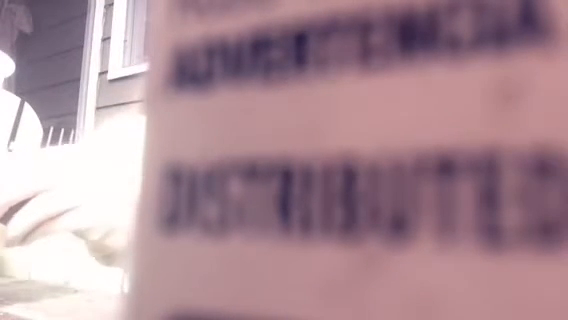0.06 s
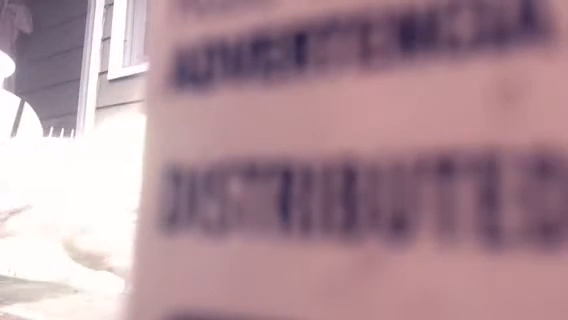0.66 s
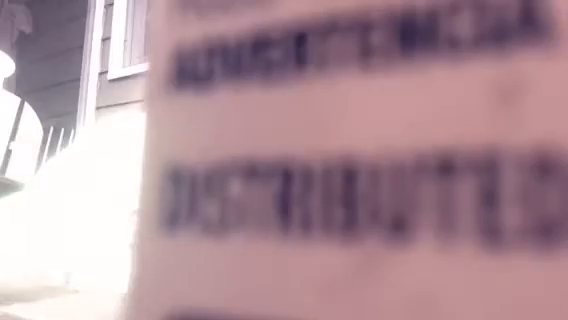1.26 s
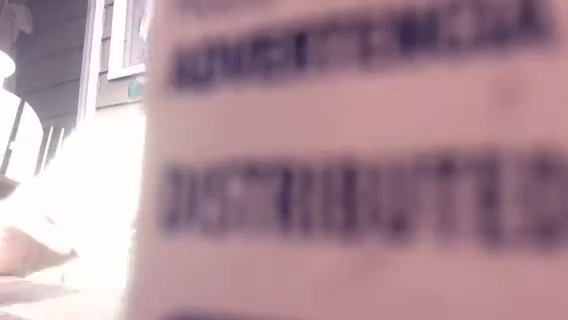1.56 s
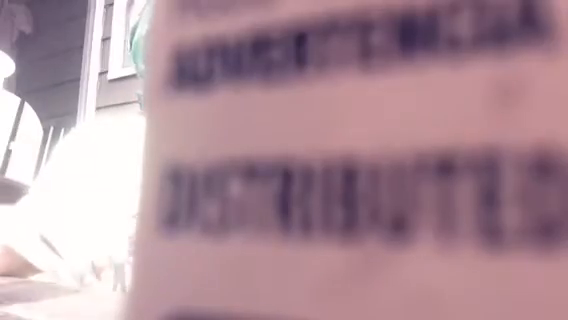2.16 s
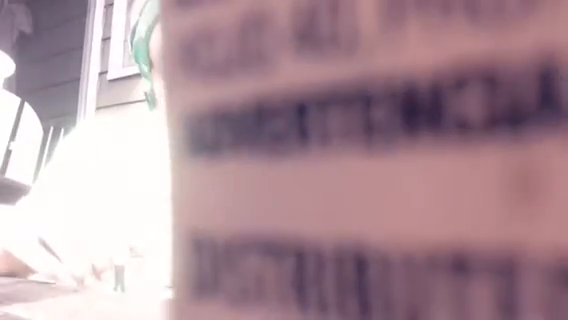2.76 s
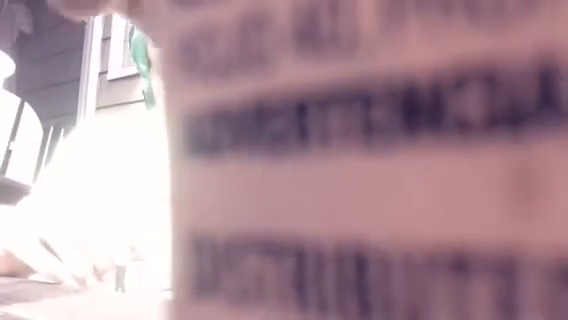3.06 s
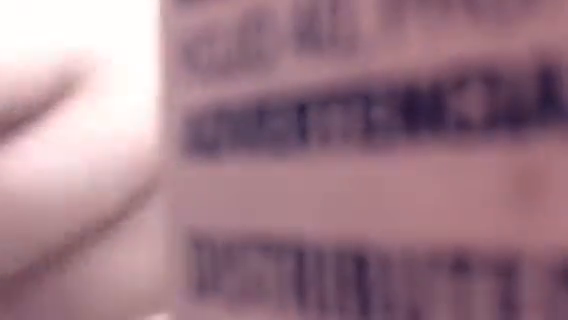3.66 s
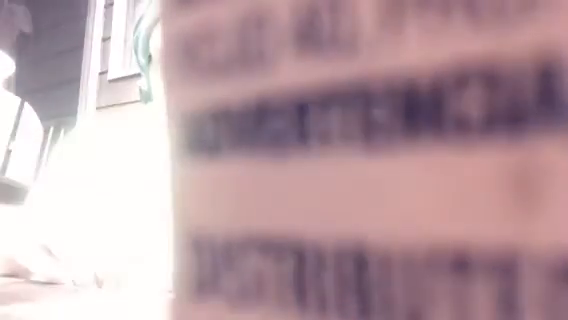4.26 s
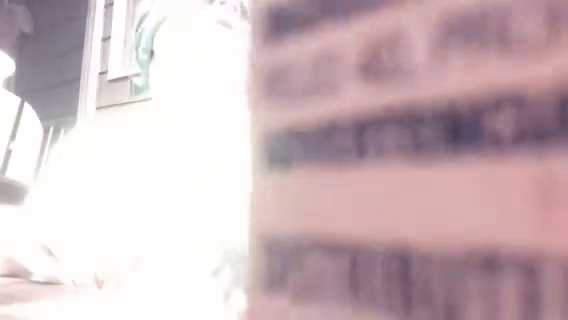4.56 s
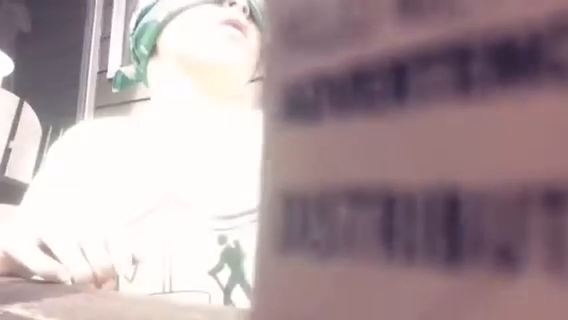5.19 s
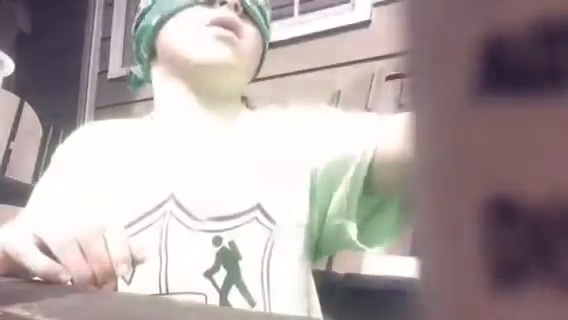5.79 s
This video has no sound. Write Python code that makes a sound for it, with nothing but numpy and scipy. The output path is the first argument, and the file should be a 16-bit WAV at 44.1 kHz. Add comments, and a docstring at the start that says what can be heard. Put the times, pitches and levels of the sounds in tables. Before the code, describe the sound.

Very close to the microphone, someone shifts a hollow box and small hard objects on a porch table. The start is quiet, then comes a sudden clatter with scraping, two separate sharp knocks, and a longer run of bumps, clacks and slides with fingers rubbing. The sound is nearly dry. Underneath are soft wind, a low hum, faint rapid interference ticks and a few thin bird calls.

```python
"""Knocks and slides on a porch table

A hollow box and small hard things are knocked, set down and pushed about close to the microphone.
Blows and friction ring the same modes: the top thumps, the things clack and scrape; fingers rub and tap.
Behind: wind rumble, a low hum, a few bird calls and even ticks of radio interference in the lead.
Near the end a faint, thin, steady tone sounds briefly at about 5.1 kHz."""
import sys
import numpy as np
from scipy import signal
from scipy.io import wavfile

SR = 44100
rng = np.random.default_rng(int(sys.argv[2]) if len(sys.argv) > 2 else 0)


def bounce(signal):
    """Save signal as a 16-bit WAV file at the path given by the first command-line argument."""
    frames = np.transpose(np.atleast_2d(signal))
    limited = np.clip(frames, -1, 1)
    pcm = np.round(limited * 32767).astype(np.int16)
    wavfile.write(sys.argv[1], SR, pcm)


N = 261513
TIME_S = np.arange(N) / SR

# (time [s], strength [dB], weight [dB], hardness [dB/octave])
BOX_BLOWS = [(2.4522, -21.5, 2, 4), (2.4581, -14, 1, -7), (2.701, -32, -14, -1), (2.7173, -22, 5, 3),
             (2.9066, -40, 13.5, -1.5), (2.9698, -49, 15, -4), (3.4235, -9.5, -5.5, -4),
             (3.471, -51, 11.5, 4), (4.4732, -25, 3, 1.1), (4.5068, -13, 4.5, -0.5),
             (4.6691, -22.5, -10, 0.5), (5.6185, -24, 4.5, -1), (5.771, -31.5, 1, 0.9)]
# (thump [dB], knock [dB], clack [dB], crack [dB], tick [dB])
BOX_VOICE_DB = [-9, 0.5, -10, -19, -33]
# (weight [dB], main ring [Hz])
BOX_RING_HZ = [(5, 570), (13, 305)]
def box_bumps():
    """A hollow box bumps the table top."""
    return knocks(BOX_BLOWS, BOX_VOICE_DB, BOX_RING_HZ, ring_share=.8)


# (time [s], strength [dB], weight [dB], hardness [dB/octave])
CLACK_BLOWS = [(0.391, -65, -3, 4), (0.487, -71, 12, 6), (0.609, -67, -3, 4), (1.302, -66, 1, 1),
               (2.4206, -19, 6.5, 3), (2.439, -18.5, 5, 0.5), (2.47, -29, -14, 4),
               (2.477, -13.5, -2.5, -1.5), (2.5581, -47.5, -12, 4.4), (2.5905, -35.5, -3.5, -4.5),
               (2.61, -33.5, -17, -9.5), (2.873, -42, 0.5, -3), (3.409, -12.5, -6.5, -1.8),
               (3.4232, -36, 4.5, 6.5), (3.789, -28, -8, -4.5), (3.8015, -16, -10.5, 1.6),
               (3.8159, -23, -10, -6), (4.494, -29.5, -16, 3.8), (4.5705, -30, 1, 0),
               (4.6125, -30, -10, -4.3), (4.619, -29, 2, -7), (4.7275, -35.5, -2.5, 2.6),
               (4.742, -31.5, 8, 1), (4.801, -25.5, 10, -3.5), (4.869, -40.5, 2.5, -4),
               (5.053, -57, 25, 4.5), (5.1392, -23, 3, -2), (5.4996, -25, 7.5, -1), (5.5365, -21.5, 3, 4),
               (5.556, -22, 8, 1.4), (5.5608, -25, 8.5, -0.5), (5.567, -34, -9, 5.5),
               (5.633, -36.5, -11, 3.2), (5.654, -25.5, 2, 0), (5.909, -51, 2, 6)]
# (thump [dB], knock [dB], clack [dB], crack [dB], tick [dB])
CLACK_VOICE_DB = [-6, 0, 2, -11, -27.5]
# (weight [dB], main ring [Hz])
CLACK_RING_HZ = [(-4, 1400), (1.5, 590), (4.5, 235)]
CLACK_RING_SHARE = .78
def clacks():
    """Small hard things strike the table as they are set down."""
    return knocks(CLACK_BLOWS, CLACK_VOICE_DB, CLACK_RING_HZ, CLACK_RING_SHARE)


def knocks(blows, voice_db, pitches, ring_share, grip_from_db=-28, grip_per_db=.05):
    """One contact per blow. The hand leaves a share of the ring time and grips harder on strong blows."""
    out = np.zeros(N)
    for start_s, strength_db, weight_db, hardness in blows:
        grip = np.clip(grip_per_db * (strength_db - grip_from_db), 0, .5)
        blow = part_gains(voice_db, strength_db, weight_db, hardness) @ contact(ring_share * (1 - grip))
        add(out, start_s, main_ring(blow, weight_db, pitches))
    return out


# (peak time [s], length [s], strength [dB], weight [dB], hardness [dB/octave])
PUSHES = [(0.629, 0.07, -68, -2, 6), (2.417, 0.028, -31, 10, -1.5), (2.468, 0.068, -15, 4.5, 0),
          (2.511, 0.034, -32.5, 7, -11), (2.595, .12, -41, 2, -1.5), (2.733, 0.075, -29.5, -8, -1.5),
          (2.787, .11, -35.5, -1, -1.8), (2.852, 0.035, -37.5, -6, -0.5), (3.408, 0.034, -24.5, -9, -4.5),
          (3.49, .07, -55.5, 1, 3.5), (3.841, 0.075, -37, -2.5, -0.5), (4.533, .067, -23, 1.5, 1.5),
          (4.607, .033, -32.5, 11.5, 2), (4.776, 0.15, -35, -15, 1.5), (5.117, .07, -26.5, 2.5, 2.5),
          (5.158, 0.055, -31.5, 4, 1), (5.228, 0.034, -39, 6, -9), (5.295, 0.034, -43, 4.5, 3),
          (5.382, 0.068, -33.5, 6, 1.64), (5.512, 0.17, -27.5, 5, 1), (5.558, 0.042, -24, -6, 4),
          (5.669, 0.041, -29.5, -8, -1.5), (5.728, 0.12, -30.5, -23, -3.5)]
# (thump [dB], knock [dB], clack [dB], crack [dB], tick [dB])
SLIDE_VOICE_DB = [-7, -1.5, -3, -15.5, -25]
# (weight [dB], main ring [Hz])
SLIDE_RING_HZ = [(3.5, 570), (8, 210)]
def slides(onset_s=.012, swell_share=.48, swell_db=14, fade_db=18):
    """Slips ring the same modes as the blows; each push swells to its hardest point and dies away."""
    out, t = np.zeros(N), np.arange(SR // 3) / SR
    for peak_s, length_s, strength_db, weight_db, hardness in PUSHES:
        swell_s, fade_s = swell_share * length_s, (1 - swell_share) * length_s
        rubbed = signal.fftconvolve(slips(SR)[None], contact(ring_share=.6), axes=1)
        steady = rubbed[:, SR // 2:SR // 2 + len(t)]
        gains = part_gains(SLIDE_VOICE_DB, strength_db, weight_db, hardness)
        scrape = sum(gain * unit_rms(part) for gain, part in zip(gains, steady))
        scrape = main_ring(scrape, weight_db, SLIDE_RING_HZ, mix_db=-4.5)
        push_db = np.minimum(swell_db * (t - swell_s) / swell_s, fade_db * (swell_s - t) / fade_s)
        add(out, peak_s - swell_s, scrape * np.minimum(t / onset_s, 1) * from_db(push_db))
    return out


# table and things: (frequency [Hz], level [dB], free t60 [s])
MODES = [(124, -16.5, 0.065), (210, -4, 0.025), (261, 2.5, 0.048), (328, -6.5, 0.051), (430, -5.5, 0.045),
         (549.6, 1.5, 0.07), (625.6, 0.5, 0.065), (741, -6, 0.062), (922.3, -1.5, 0.12), (981, -3.5, 0.089),
         (1094.4, 1, 0.067), (1172, 3, 0.049), (1269, -4, .055), (1443, -6, 0.045), (1810, -8.5, 0.03),
         (2410, -1.5, 0.06), (3280, -12.5, 0.025), (3960, -2, 0.01), (4700, -9.5, 0.011),
         (7500, 0.5, 0.0072), (9130, -7.5, .006), (13300, -8, .005)]
# thump, knock, clack, crack, tick: (low [Hz], high [Hz], crowd t60 [s], crowd [dB], click [dB])
PART_BANDS = [(65, 360, 0.071, -1.5, -10), (376.3, 850, 0.059, -6, -12), (835, 2300, .03, -1, -16),
              (2550, 4880, 0.034, 1, 1.5), (5770, 12000, 0.021, 6.5, 4)]
# (frequency [Hz], level [dB])
CONTACT_SPECTRUM = [(50, -11.5), (120, -8), (230, -2), (400, -4.5), (580, 3.5), (800, -5.5), (1200, 4),
                    (2200, -10), (3000, -8.5), (4100, -8), (5000, -19), (5900, -28), (7700, -19.5),
                    (10000, -34), (15500, -46)]
def contact(ring_share, spread_db=2.5, tail_db=-33, tail_t60_s=.28):
    """One touch in five bands, each with a first click, strong modes, a crowd of weak ones and a tail."""
    t = np.arange(SR // 4) / SR
    hz, mode_db, t60_s = np.transpose(MODES)
    strength = from_db(mode_db + spread_db * rng.standard_normal(len(hz)))  # varies with the spot struck
    phase_rad = rng.standard_normal((len(hz), 1))  # nearly in step: tall first peak
    decay = from_db(-60 * t / (t60_s[:, None] * ring_share))
    rings = strength[:, None] * np.cos(2 * np.pi * hz[:, None] * t + phase_rad) * decay
    impulse = coloured(1. * (t == 0), CONTACT_SPECTRUM)
    grain = coloured(rng.standard_normal(len(t)), CONTACT_SPECTRUM)
    parts = []
    for low, high, crowd_t60_s, crowd_db, click_db in PART_BANDS:
        strong = unit_attack(band(rings[(hz >= low) & (hz < high)].sum(0), low, high, order=2))
        crowd = unit_attack(band(grain * from_db(-60 * t / (crowd_t60_s * ring_share)), low, high))
        click = unit_attack(band(impulse, low, high, order=2))
        tail = unit_rms(band(grain, low, high)) * from_db(tail_db - 60 * t / (tail_t60_s * ring_share))
        parts.append(unit_attack(strong + from_db(crowd_db) * crowd + from_db(click_db) * click + tail))
    return np.array(parts)


def part_gains(voice_db, strength_db, weight_db, hardness):
    """Five band gains: weight feeds the thump, hardness tilts everything above the knock."""
    centre_hz = np.array([np.sqrt(low * high) for low, high, *_ in PART_BANDS])
    octaves = np.log2(centre_hz / centre_hz[1])
    return from_db(strength_db + np.array(voice_db) + np.where(octaves < 0, weight_db, hardness * octaves))


def main_ring(x, weight_db, pitches, mix_db=-1.5, q=3.2):
    """Lifts one resonance at constant energy: the thing's own if light, the lower table top if heavy."""
    hz = np.interp(weight_db, *np.transpose(pitches))
    resonance = signal.lfilter(*signal.iirpeak(hz, q, fs=SR), x)
    return unit_rms(x + from_db(mix_db) * resonance) * np.sqrt(np.mean(x ** 2))


def slips(size, rate_per_s=1000, hiss_gain=.18):
    """Friction: tiny uneven slips over a smooth hiss."""
    sizes_db = 4.5 * np.minimum(rng.exponential(1, size), 3)
    jolts = (rng.random(size) < rate_per_s / SR) * from_db(sizes_db)
    return jolts * rng.choice([-1, 1], size) + hiss_gain * rng.standard_normal(size)


# (time [s], level [dB])
RUB_LEVELS = [(4.45, -48.5), (4.52, -45), (4.66, -46), (4.914, -49.5), (5.356, -44.5), (5.586, -39),
              (5.772, -42.5), (5.93, -42.5)]
# (frequency [Hz], level [dB])
RUB_SPECTRUM = [(50, -27), (150, -5.5), (250, 9.5), (400, -1), (590, 3.5), (780, -3), (1150, -1),
                (1800, -16), (2900, -17), (4200, -21), (5900, -35), (7800, -22), (11000, -45.5),
                (15500, -39)]
def finger_rub(gain_db=-3, judder_db=4.5):
    """Fingers rub softly and unevenly as they shift their hold."""
    level_db = np.interp(TIME_S, *np.transpose(RUB_LEVELS), left=-120) + gain_db + judder_db * drift(70)
    return from_db(level_db) * unit_rms(coloured(slips(N), RUB_SPECTRUM))


def finger_taps(rate_per_s=4.2):
    """Fingertips tap faintly, at random times and strengths."""
    touches = (rng.random(N) < rate_per_s / SR) * rng.uniform(.5, 1, N)
    gains = part_gains(CLACK_VOICE_DB, strength_db=-78, weight_db=0, hardness=5.6)
    return signal.fftconvolve(touches, gains @ contact(CLACK_RING_SHARE))[:N]


def porch(x, wet_db=-28, t60_s=.16, delay_s=.0072, dull_hz=3000):
    """Wall and roof return a short, dull scatter of echoes."""
    t = np.arange(SR // 2) / SR
    echoes = band(rng.standard_normal(len(t)), 120, dull_hz, order=1)
    echoes *= from_db(-60 * t / t60_s) * (t > delay_s)
    return x + from_db(wet_db) * signal.fftconvolve(x, echoes / np.sqrt(np.sum(echoes ** 2)))[:N]


# (frequency [Hz], density [dB])
AIR_SPECTRUM = [(15, -51.5), (25, -24), (64, -5.5), (114, -5.5), (166, -7.5), (185, -11), (277, -14.5),
                (301, -18), (335, -19.5), (489, -23), (796, -25), (1100, -23), (1840, -37), (4300, -40.5),
                (5600, -46.5), (7200, -46), (16000, -59.5)]
def wind(rumble_db=-52, rush_db=-58, gust_db=3, split_hz=260):
    """Outdoor air: a gusty rumble under a smooth, distant rush."""
    noise = coloured(rng.standard_normal(N), AIR_SPECTRUM)
    rumble = unit_rms(band(noise, 22, split_hz, order=2) * from_db(gust_db * drift(18)))
    rush = unit_rms(band(noise, split_hz, 18000))
    return from_db(rumble_db) * rumble + from_db(rush_db) * rush


# (frequency [Hz], level [dB])
HUM_TONES = [(75.4, -61), (110, -59.5), (457.6, -77.5), (493.4, -76.5), (1077, -82.5)]
def hum(waver_db=1.5, waver_rad=.61):
    """A low hum whose tones waver in level and phase."""
    out = np.zeros(N)
    for hz, level_db in HUM_TONES:
        amplitude = np.sqrt(2) * from_db(level_db + waver_db * drift(2.5))
        out += amplitude * np.sin(2 * np.pi * hz * TIME_S + waver_rad * drift(8.7))
    return out


# (start [s], end [s], start pitch [Hz], end pitch [Hz], level [dB])
HIGH_TONES = [(2.55, 2.674, 7800, 7500, -79), (2.74, 2.882, 7600, 7300, -74),
              (3.87, 4.087, 2110, 2030, -69.5), (4.367, 4.49, 7750, 7430, -69.5),
              (4.624, 4.812, 7960, 7440, -73), (5.765, 5.873, 5050, 5140, -62.5)]
def bird_calls():
    """Distant calls: the high ones buzzy, the low one clean."""
    return sum(glide(*row) for row in HIGH_TONES[:-1])


def thin_tone():
    """A faint, thin, steady tone near 5.1 kHz."""
    return glide(*HIGH_TONES[-1])


def glide(start_s, end_s, from_hz, to_hz, level_db, buzzy_above_hz=6000):
    """A slightly gliding sine swells and fades; fast warble makes a high one buzz."""
    along = np.clip((TIME_S - start_s) / (end_s - start_s), 0, 1)
    warble = .02 if from_hz > buzzy_above_hz else .003
    hz = (from_hz + (to_hz - from_hz) * along) * (1 + warble * drift(540))
    swell = np.sqrt(2) * from_db(level_db) * np.sin(np.pi * along)
    return swell * np.sin(2 * np.pi * np.cumsum(hz) / SR)


def interference(start_s=.1252, period_s=.1024, level_db=-61, spread_db=2, t60_s=.012):
    """Evenly spaced radio bursts leak into the microphone lead as thin ticks."""
    count, age_s = np.divmod(TIME_S - start_s, period_s)
    sizes_db = spread_db * rng.standard_normal(100)[count.astype(int)]
    hiss = unit_rms(band(rng.standard_normal(N), low_hz=6100, high_hz=7900))
    return hiss * from_db(level_db + sizes_db - 60 * age_s / t60_s)


def background_gain(ease_db_per_s=.19, dip_at_s=3.49, fall_s=.07, hold_s=.081, recover_s=.46, dip_db=8):
    """The level eases off slowly and dips once."""
    since_s = TIME_S - dip_at_s
    dip = np.clip(np.minimum(since_s / fall_s, 1 - (since_s - fall_s - hold_s) / recover_s), 0, 1)
    return from_db(-ease_db_per_s * TIME_S - dip_db * dip)


def from_db(db):
    """Decibels to gain."""
    return 10 ** (np.asarray(db) / 20)


def unit_rms(x):
    """Scales to rms 1."""
    return x / np.sqrt(np.mean(x ** 2) + 1e-20)


def unit_attack(x):
    """Scales to rms 1 over the first 10 ms."""
    return x / np.sqrt(np.mean(x[:SR // 100] ** 2) + 1e-20)


def band(x, low_hz, high_hz, order=3):
    """Causal band-pass."""
    edges_hz = [low_hz, min(high_hz, .45 * SR)]
    return signal.sosfilt(signal.butter(order, edges_hz, "band", fs=SR, output="sos"), x)


def coloured(x, spectrum, size=4096):
    """Minimum-phase filter from (frequency [Hz], level [dB]) points."""
    hz, db = np.transpose(spectrum)
    bins_hz = np.maximum(np.abs(np.fft.fftfreq(size, 1 / SR)), 1)
    log_gain = np.log(from_db(np.interp(np.log(bins_hz), np.log(hz), db)))
    response = np.fft.ifft(np.exp(np.conj(signal.hilbert(log_gain)))).real
    return signal.fftconvolve(x, response)[:len(x)]


def drift(rate_hz):
    """Random wander between unit-normal knots."""
    knots = rng.standard_normal(4000)
    return np.interp(TIME_S * rate_hz, np.arange(len(knots)), knots)


def add(out, start_s, sound):
    """Mixes a sound in at start_s."""
    at = int(start_s * SR)
    out[at:at + len(sound)] += sound[:N - at]


def scene():
    """The table close by, radiating little deep bass; the outdoors behind."""
    handling = box_bumps() + clacks() + slides() + finger_rub() + finger_taps()
    table = porch(band(handling, 38, 20000, order=2))
    gain = background_gain()
    return (table + gain * (wind() + hum()) + bird_calls() + thin_tone() + gain * interference())[None]


def record(dry, cutoff_hz=15900):
    """The hardest blows overload the microphone; the top treble is cut."""
    rounded = dry / (1 + dry ** 6) ** (1 / 6)
    return signal.sosfilt(signal.ellip(10, .1, 80, cutoff_hz, fs=SR, output="sos"), rounded)


dry = scene()
out = record(dry)
bounce(out)
```